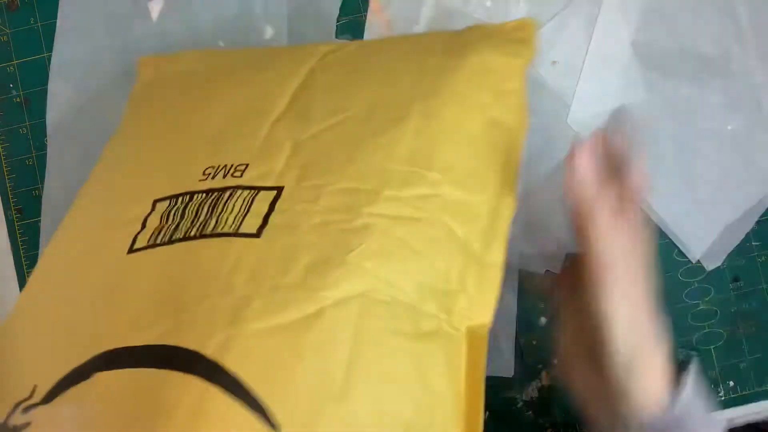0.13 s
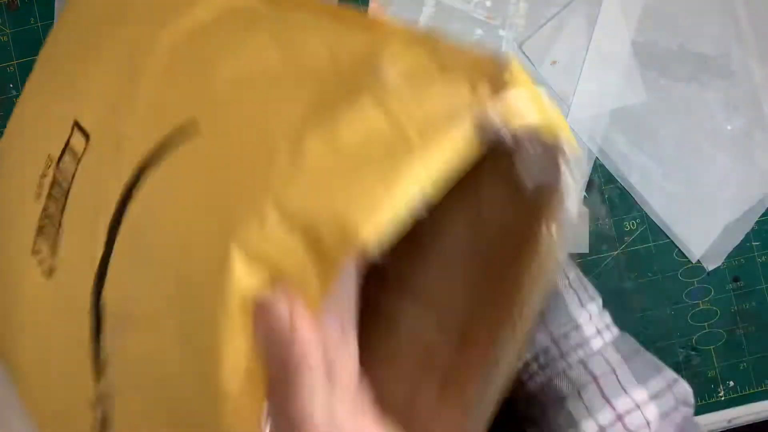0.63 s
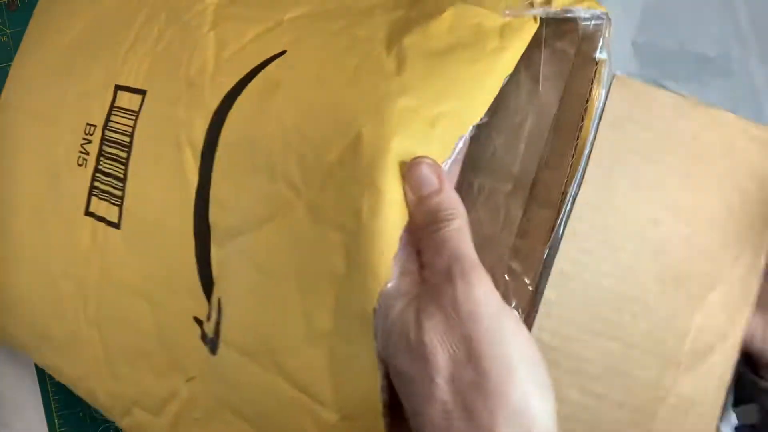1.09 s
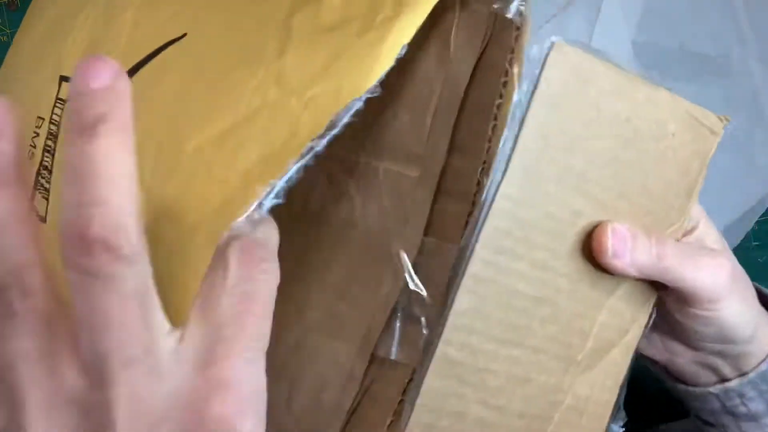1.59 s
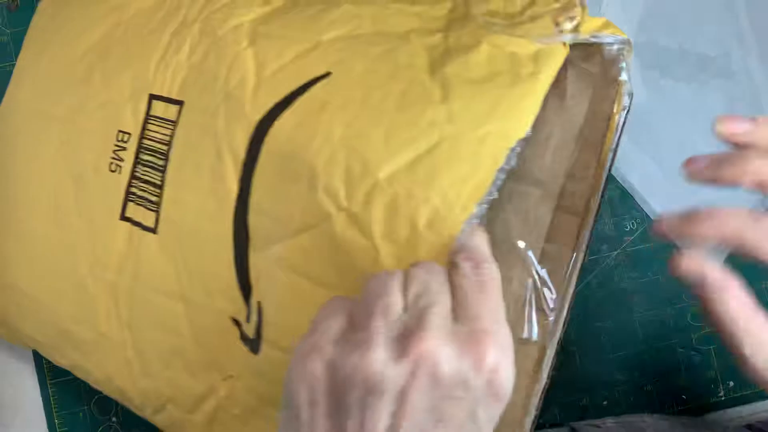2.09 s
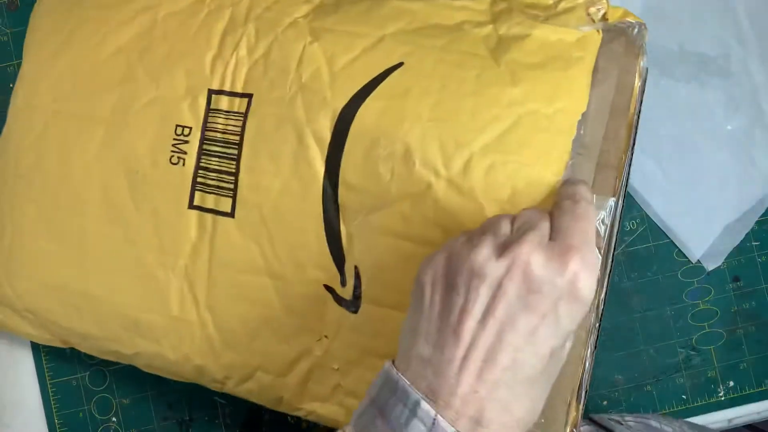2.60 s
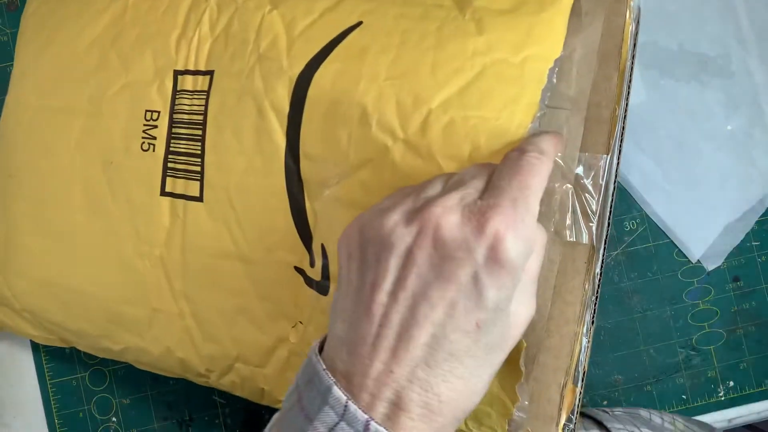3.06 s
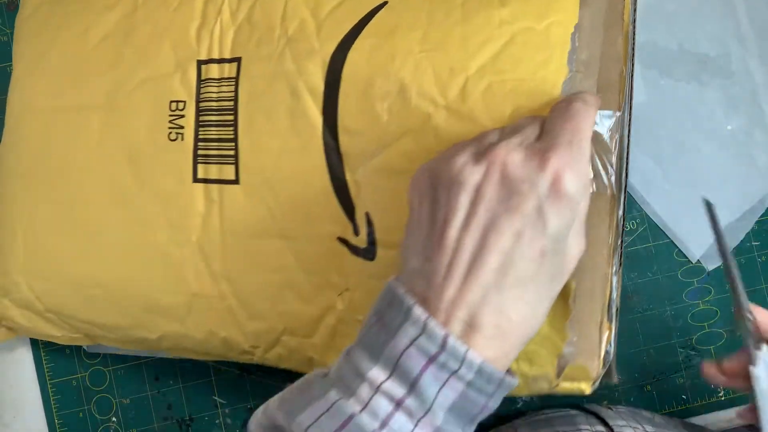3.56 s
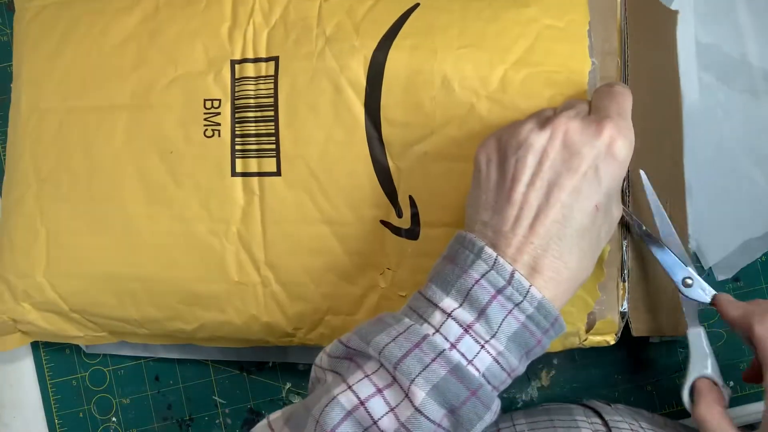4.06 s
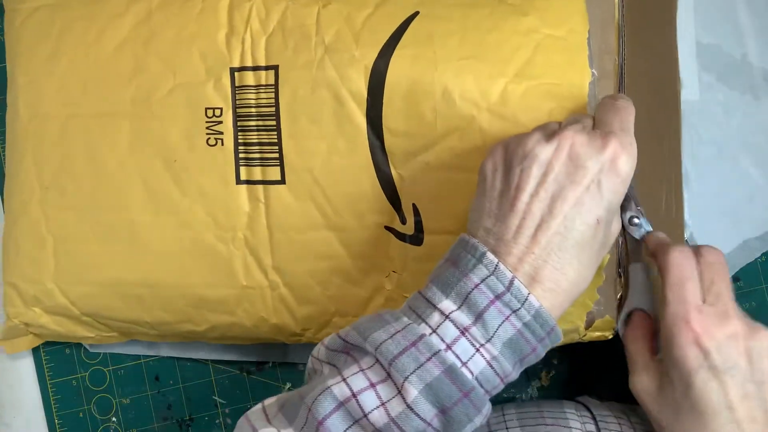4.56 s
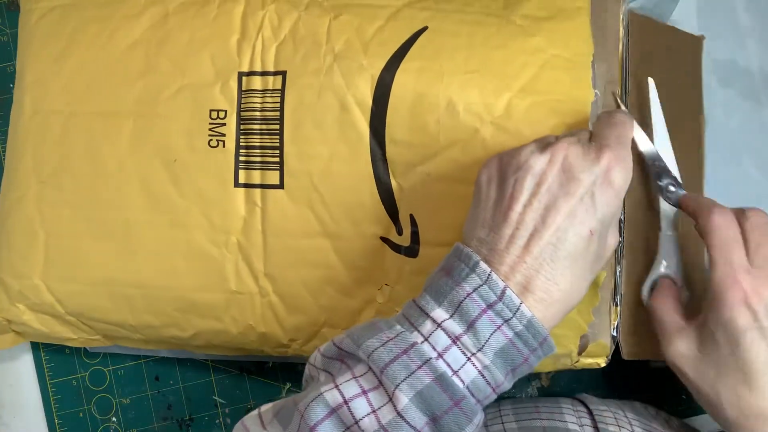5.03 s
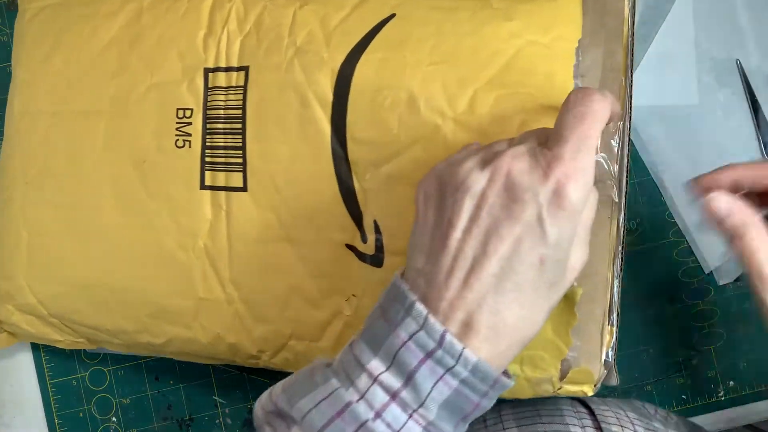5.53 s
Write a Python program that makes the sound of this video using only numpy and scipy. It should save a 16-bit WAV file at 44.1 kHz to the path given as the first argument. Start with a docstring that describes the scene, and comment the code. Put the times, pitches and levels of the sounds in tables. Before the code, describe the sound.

Very close in a small quiet room, a stiff padded mailer is turned and gripped, with loud snapping crinkles, hollow box knocks and low desk thuds. After two seconds it calms to faint finger rubbing and tiny metal ticks, then a soft slide. Lighter crackles and knocks return around four seconds, and scissors clack sharply on the mat near the end.

```python
"""A padded paper mailer with a cardboard box inside is turned and pressed close to two microphone ports.
Paper is shaped noise with snapping folds and ringing facets; the box knocks and hums through resonances;
desk and mat rumble as the weight lands. Later a taped edge hums under a finger, small tools jingle,
something smooth slides and scissors strike the mat, the steel being decaying modes. Quiet small room."""
import sys
import numpy as np
from scipy import signal
from scipy.fft import rfft, irfft
from scipy.io import wavfile
from scipy.ndimage import uniform_filter1d

SR = 44100
rng = np.random.default_rng(int(sys.argv[2]) if len(sys.argv) > 2 else 0)


def dump(signal):
    """Clip the signal to [-1, 1] and save it as 16-bit WAV at the path in sys.argv[1]."""
    limited = np.clip(np.atleast_2d(signal).T, -1, 1)
    pcm = np.round(limited * 32767).astype(np.int16)
    wavfile.write(sys.argv[1], SR, pcm)


def gain_from_db(level_db):
    """Convert decibel levels to linear amplitude factors (20 dB per decade)."""
    decades = np.asarray(level_db, float) / 20
    return 10 ** decades


N = 249606
TIME = np.arange(N) / SR
COARSE = np.arange(0, N / SR, .002)  # slower clock for gestures, s

# Edges between the dull, crisp and hissing parts of the paper. Three values: low, middle, high in Hz.
SPLIT_HZ = (644, 2910, 6250)


def over_hz(table, column):
    """One column of a frequency table on the transform's bins, interpolated over log frequency."""
    hz = np.maximum(np.arange(N // 2 + 1) * SR / N, 1)
    return np.interp(np.log(hz), np.log(np.array(table)[:, 0]), np.array(table)[:, column])


def noise():
    """Unrelated white noise for the two ports."""
    return rng.standard_normal((2, N))


def sides(pan_db):
    """Gains of left and right for a left-minus-right level."""
    return gain_from_db(np.array([pan_db, -pan_db]) / 2)


def unit(x):
    """Scale to rms 1."""
    return x / np.sqrt(np.mean(x ** 2))


def add(out, s, burst):
    """Mix a burst in from time s."""
    i = int(s * SR)
    out[..., i:i + burst.shape[-1]] += burst[..., :N - i]


def fade(t60_s, rise_s):
    """Quick rise, exponential fall."""
    t = np.arange(int(1.2 * t60_s * SR) + 64) / SR
    return (1 - np.exp(-t / rise_s)) * np.exp(-np.log(1000) * t / t60_s)


def swells(s, held_s, db, rise_db_s, fall_db_s):
    """Power of gestures that rise, hold and let go at steady rates in dB, one row each."""
    start, end = s[:, None], (s + held_s)[:, None]
    before_s = np.maximum(start - COARSE, 0)
    after_s = np.maximum(COARSE - end, 0)
    return gain_from_db(2 * (db[:, None] - rise_db_s * before_s - fall_db_s * after_s))


def crackle(per_s, spread_db, t60_s, share):
    """Envelope of many tiny buckles, a few much larger, over even rubbing; rms 1."""
    chance, size = rng.random((N, 2)).T
    buckles = (chance < per_s / SR) * gain_from_db(-2 * spread_db * np.log(1 - size * .99))
    power = signal.lfilter([1], [1, -np.exp(-2 * np.log(1000) / (t60_s * SR))], buckles)
    return np.sqrt(1 - share + share * power / power.mean())


def resonate(x, modes):
    """Sum of resonances, scaled so that white noise of rms 1 comes out near rms 1."""
    rung = sum(gain_from_db(db) * signal.lfilter(*signal.iirpeak(hz, hz / width_hz, fs=SR), x)
               for hz, width_hz, db in modes)
    return rung / np.sqrt(sum(gain_from_db(2 * db) * np.pi * width_hz / SR for hz, width_hz, db in modes))


def ring(x, hz, t60_s):
    """One mode: an impulse of 1 rings at amplitude 1 and dies in t60."""
    r, turn = np.exp(-np.log(1000) / (t60_s * SR)), 2 * np.pi * hz / SR
    return signal.lfilter([np.sin(turn)], [1, -2 * r * np.cos(turn), r * r], x)


def struck(blows, modes, contact_db, contact_s):
    """Each blow is a few milliseconds of rattling contact that rings the steel."""
    contact = np.zeros(N)
    for s, db in blows:
        add(contact, s, gain_from_db(db + contact_db) * fade(contact_s, rise_s=0.001))
    return sum(gain_from_db(db) * ring(contact * noise(), hz, t60_s) for hz, db, t60_s in modes)


def hands():
    """Grips over resting contact: crisp dB, dull and hiss dB over it, left minus right dB, box dB, resting dB."""
    # Hands resting and sliding on the parcel. Each row: time in seconds, paper level in dB,
    # brightness in dB, box over paper in dB, left minus right in dB.
    contact = [(0, -40, 0, -14, -8), (.6, -43, 2.5, -7.5, -6.5), (.87, -45.5, -2, 0, -5.5),
               (.98, -49.5, -4, -2.5, -7), (1.4, -38.5, 2.5, -22, -7.5), (1.63, -47, 1, -9, -5.5),
               (1.95, -46, -0.5, -13, -5), (2.1, -49.5, 4, -12, -6), (2.22, -59, 2, 0.5, -5),
               (2.45, -55, 2, -11, -8), (2.63, -65, -2, 8, -3.5), (2.77, -58, -5.5, 4.5, -5.5),
               (3.0, -63, -6, 0.5, -5.5), (3.1, -86, 7, 4, -7), (3.34, -68.5, 6, -11.5, -12.5),
               (3.4, -60, -3, 4, -7.5), (3.74, -62, -2, -1, -10), (3.9, -52, 4, -12.5, -3.5),
               (4.13, -53, -0.5, -7, 2.5), (4.3, -46.5, -1, 2.5, -6.5), (4.5, -51, 1.5, -2, -3.5),
               (4.9, -55.5, -4, -20, -9.5), (4.96, -60.5, 4.5, 2, -7.5), (5.169, -58.5, 6.5, -15, -6),
               (5.268, -74, 5, -8, -12), (5.3, -68, 12, 6, -15), (5.4, -53.5, 1.5, -6, -1.5),
               (5.49, -60, -2, -1, -2), (5.66, -56.5, -6, -6, -5.5)]
    # Fingers gripping, pressing and pulling. Each row: full grip at seconds, held seconds,
    # paper level in dB, brightness in dB, box over paper in dB.
    grips = [(0.0, 0.017, -30, -3.5, -5.5), (0.126, 0.025, -35.5, 0.5, -5), (.16, .012, -37.5, 7, -2),
             (.19, 0.072, -33.5, -2, -4.5), (0.289, 0.026, -32.5, 0.5, -11.5),
             (0.403, 0.019, -35, -1, -5.5), (.46, 0.06, -35, -2, -12), (0.523, 0.0081, -45, 1, 10),
             (0.632, 0.038, -30, -2.5, -4), (.69, 0.031, -32.5, -3, -10), (0.799, 0.032, -37.5, -1, -12),
             (1.006, 0.022, -40, 0.5, -20), (1.13, 0.026, -41, 0, -9), (1.17, 0.06, -35.5, -3.5, -1),
             (1.24, 0.04, -31, 1.5, 0), (1.35, 0.02, -39, -4, 3), (1.465, 0.0048, -35.5, 6, 1.5),
             (1.49, 0.046, -41.5, -4, 0.5), (1.55, 0.071, -47, 7, -2), (1.652, 0.0087, -31.5, 4, -30),
             (1.703, 0.028, -30.5, -0.5, -6.5), (1.828, 0.059, -41.5, 2.5, -9),
             (1.889, 0.01, -44, -12.5, 2), (2.038, 0.018, -36.5, -4.5, -13), (2.109, 0.0083, -46, -1, -14),
             (2.318, 0.071, -47.5, -3, -4), (2.37, 0.035, -44.5, 1, -8), (2.44, 0.017, -58.5, -2, 2),
             (2.708, 0.014, -59, -17.5, 9), (2.8, .015, -65, 7, -6), (2.88, 0.014, -56.5, 8, 6),
             (2.97, 0.014, -55.5, 4, -3), (3.8, 0.038, -53, 5.5, -0.5), (3.86, 0.039, -49, 6, -16),
             (4.18, 0.059, -58.5, -4, 8), (4.27, 0.0084, -45, -1, -12), (4.35, 0.038, -57, 0, 15.5),
             (4.385, 0.027, -61.5, 0, 16), (4.554, 0.038, -42.5, 1.5, 1.5), (4.616, 0.0084, -46, 2, 0.5),
             (4.665, 0.012, -41.5, -1, -5), (4.71, 0.044, -49, -1, 4), (4.75, 0.024, -52.5, 10, 16),
             (4.784, 0.0077, -49, 0, 21), (4.825, 0.019, -48.5, 10.5, 14.5), (5.133, 0.0062, -61, 3, -17),
             (5.281, .02, -45, 7, -28), (5.303, 0.0042, -31, -1, -9), (5.624, 0.0041, -43.5, -4, -3)]
    dull_offset_db, hiss_offset_db = -7.5, -10  # over the crisp part at brightness 0

    at, *columns = np.transpose(contact)
    rest_db, rest_bright, rest_box, pan_db = (np.interp(COARSE, at, c) for c in columns)
    s, held_s, db, bright, on_box = np.transpose(grips)
    # 596.5 dB/s for a 67 ms hold; shorter grips come on faster
    rise_db_s = 596.5 * (0.067 / np.clip(held_s, .005, .2))[:, None] ** 0.27
    grip_power = swells(s, held_s, db, rise_db_s, fall_db_s=305.5)

    def total_db(rest, grip):
        """Rest and grips added in power, each with its offset in dB."""
        return 10 * np.log10(gain_from_db(2 * (rest_db + rest)) + gain_from_db(2 * grip) @ grip_power)

    crisp_db = total_db(0, 0 * db)
    dull_db = total_db(-rest_bright, -bright) - crisp_db + dull_offset_db
    hiss_db = total_db(rest_bright, bright) - crisp_db + hiss_offset_db
    controls = (crisp_db, dull_db, hiss_db, pan_db, total_db(rest_box, on_box), rest_db)
    return [np.interp(TIME, COARSE, c) for c in controls]


def paper(touch):
    """Rustle and snapping folds shake the same sheet: three spectral parts, each with its own strength."""
    # Folds snapping. Each row: start in seconds, level in dB, dull part and hissing part over it in dB,
    # panel pitch in Hz.
    cracks = [(.005, -20.5, 4.5, -4, 3620), (0.0406, -21.5, -1, -5.5, 2620), (.1214, -29, 6.5, -5, 3380),
              (.194, -22.5, 1, -17, 3820), (0.2157, -19, -11, -9, 3140), (0.2887, -13.5, -9.5, -5, 4110),
              (0.3384, -26, 7, -20, 1580), (0.399, -11.5, -24, -2, 4840), (0.5214, -15, 0, -2.5, 6300),
              (0.5241, -19.5, 3, -13.5, 1050), (0.5541, -24.5, -20, -1, 6840), (.63, -22, -1, -13, 3530),
              (.7144, -45, -9, 11, 1180), (.7716, -26, -23, -18, 6200), (0.781, -24.5, -19, -10, 5760),
              (0.8151, -22.5, -1.5, -22, 1410), (0.887, -38, -14, 0, 980), (0.9371, -34, -17, .5, 6400),
              (.972, -40, 0, -3, 2020), (0.987, -32, -21, -7, 6750), (1.004, -22, -6, -4, 5100),
              (1.122, -46.5, -5, 9, 2940), (1.14, -29, 0, -1, 4800), (1.1636, -34, 7.5, 4, 1650),
              (1.234, -23, -16.5, -1, 3300), (1.2435, -23, -2, -10, 1380), (1.268, -17, -1.5, 0.5, 6060),
              (1.3379, -37, -4, -15, 4200), (1.3735, -25, -2.5, -13, 1750), (1.465, -21, -0.5, -2.5, 4880),
              (1.487, -27, 1, -12, 1520), (1.6521, -22, -0.5, -3, 1580), (1.6636, -14.5, -5, -8, 4450),
              (1.711, -23, 2.5, -17, 5160), (1.8388, -35, 4, 1, 2100), (1.8819, -32, -8, -9, 1200),
              (1.9216, -27.5, -10, -9, 6030), (2.021, -36, 5, 5, 4060), (2.0442, -27, -20, -8, 1274),
              (2.1123, -32, -13, -14, 5940), (2.135, -34, -12, -2.5, 5900), (2.185, -46.5, -4, -17, 2100),
              (2.2777, -40, -9, -5, 4500), (2.365, -36.5, 4, -6, 1860), (2.4608, -33, -25, -17, 5700),
              (2.577, -40.5, -9, -14, 5440), (2.643, -33.5, -26, -14.5, 3700),
              (2.7066, -34.5, -7, -19, 1160), (2.7217, -34, -17, -8, 1600), (2.8004, -47, -7, 1, 1000),
              (2.859, -42.5, -3, -8, 1830), (2.895, -38.5, -0.5, -1, 1820), (2.9254, -47, -17, 3, 2620),
              (2.969, -46, 7.5, -15, 2740), (2.979, -37.5, -1.5, -10, 6250), (3.0475, -56.5, -21, -1, 4440),
              (3.1626, -50.5, -4, -11.5, 4350), (3.2144, -57.5, -13.5, -15.5, 2490),
              (3.271, -49, -24, -17, 5930), (3.3116, -49.5, -13, -15, 6660), (3.3666, -34, 1.5, -3.5, 1850),
              (3.7827, -36.5, -2, -5.5, 3670), (3.8016, -44, -2, -14, 1320), (4.3112, -37, -21, 7, 7100),
              (4.3546, -27.5, 0, -7, 3470), (4.5395, -26.5, -10, -19, 6900), (4.555, -35, 3.5, -2, 3280),
              (4.577, -28.5, -2, -3.5, 3220), (4.6126, -28.5, -21, -5, 3200), (4.6462, -45, 12, 12.5, 1220),
              (4.6636, -24.5, 1, -0.5, 4700), (4.705, -26, 2.5, -2.5, 1560),
              (4.7658, -39.5, 7.5, -10, 1280), (4.782, -27, -6, -3, 1510), (4.8835, -40.5, 8.5, -8, 2540),
              (5.13, -36, -11, 3.5, 2480), (5.2761, -13.5, -18, -10, 4100), (5.3037, -12, -5, 4, 4430),
              (5.3745, -37, -21, -17, 4520), (5.4191, -39, -19, -13, 5300), (5.5564, -39, 3.5, -25, 3370),
              (5.5895, -45.5, 4, -34, 2120), (5.6252, -21, -8.5, -23, 5000),
              (5.6314, -21.5, -18, -16, 3230)]
    # Tone shaping of the paper noise. Each row: frequency in Hz, gain in dB.
    tone_shaping = [(700, -12), (1500, -2.5), (3000, -4), (5000, -4.5), (7000, 1), (9000, 10.5), (11000, 2),
                    (13000, 2.5), (15500, -3.5)]

    crisp_db, dull_db, hiss_db, pan_db, *_ = touch
    shared = sides(pan_db) * crackle(per_s=260, spread_db=3.5, t60_s=0.057, share=0.5)
    parts_db = (crisp_db + dull_db, crisp_db, crisp_db + hiss_db)
    rustle = [gain_from_db(db) * shared * crackle(per_s=660, spread_db=3.5, t60_s=0.029, share=0.14) for db in parts_db]
    power = np.array(rustle) ** 2
    panels = np.zeros((2, N))
    for (s, db, dull, hiss, hz), turn in zip(cracks, rng.random((len(cracks), 2, 1))):
        place = sides(pan_db[int(s * SR)])[:, None]
        # larger, lower panels settle longer
        shape = fade(0.033 * (4600 / hz) ** 0.9, rise_s=.0002)
        # the fold gives way at once, then settles
        shape = shape * (0.5 + 1.35 * np.exp(-np.arange(len(shape)) / (0.00057 * SR)))
        levels = gain_from_db(db - 2.0 + np.array([dull, 0, hiss]))[:, None, None]
        add(power, s, (levels * place * shape) ** 2)
        # the flat panel beside the fold rings for a few cycles
        facet = fade(min(40 / hz, .03), rise_s=0.00014)
        tone = np.sin(2 * np.pi * (hz * np.arange(len(facet)) / SR + turn))
        add(panels, s, gain_from_db(db) * place * facet * tone)

    low, middle, high = SPLIT_HZ
    bands = (signal.butter(2, [low, middle], "band", fs=SR, output="sos"),
             signal.butter(2, [middle, high], "band", fs=SR, output="sos"),
             signal.butter(2, high, "high", fs=SR, output="sos"))
    power[0] = np.roll(power[0], int(0.0026 * SR), axis=1)  # slow bending waves: the dull part arrives late
    gains = gain_from_db([12, 8, 8])
    sheet = sum(g * signal.sosfilt(b, np.sqrt(p) * noise()) for g, b, p in zip(gains, bands, power))
    return irfft(rfft(sheet) * gain_from_db(over_hz(tone_shaping, 1)), N) + panels


def crinkles(touch, per_s, spread_db, cycles):
    """Small flat facets between creases pop at random; each size of facet rings at its own pitch."""
    crisp_db, dull_db, hiss_db, pan_db, *_ = touch
    out = np.zeros((2, N))
    for hz in np.geomspace(900, 14000, num=22):
        when, size = rng.random((N, 2)).T
        pops = (when < per_s / SR) * gain_from_db(-spread_db * np.log(1 - .98 * size))
        tilt_db = dull_db if hz < SPLIT_HZ[1] else hiss_db if hz > SPLIT_HZ[2] else 0
        pops = pops * gain_from_db(crisp_db + tilt_db) * sides(pan_db) * np.sign(noise())
        out += ring(pops, hz, cycles / hz)
    return out


def box(touch):
    """Rubbing and knocks shake the hollow box's resonances; a knock also rings briefly at its own pitch."""
    # Resonances of the box. Each row: frequency in Hz, width in Hz, level in dB.
    box_modes = [(259, 100, 2.5), (370.8, 25, 6), (453, 56, 3), (560, 100, 6.5), (724, 23, 2),
                 (845, 38, -1.5)]
    # Box and mat knocked. Each row: start in seconds, level in dB, nominal pitch in Hz,
    # t60 in seconds before limiting, left minus right in dB.
    knocks = [(0.048, -29.5, 232, 0.079, -0.5), (0.129, -39, 458, 0.055, 3), (0.152, -30.5, 382, 0.043, 3),
              (0.192, -27.5, 425, 0.081, -14), (0.246, -29, 737, 0.064, -6), (0.292, -35, 422, 0.074, -1),
              (0.338, -34, 557, 0.14, -11), (0.524, -20.5, 563, 0.06, -13), (0.54, -31.5, 240, 0.06, -1),
              (0.629, -32.5, 226, 0.16, -11.5), (0.781, -36.5, 228, 0.16, -1),
              (0.813, -22, 790, 0.018, -14), (1.004, -32, 358, 0.089, 9), (1.166, -24.5, 383, 0.057, 7.5),
              (1.239, -23.5, 883, 0.056, 2), (1.291, -34.5, 383, 0.11, -7), (1.363, -27, 640, 0.05, -8),
              (1.469, -29.5, 205, 0.029, -18), (1.492, -27.5, 418, 0.021, 12),
              (1.652, -24, 538, 0.042, 1.5), (1.704, -33, 314, 0.044, 2), (1.716, -36, 348, 0.064, 9),
              (1.74, -26, 560, 0.045, 2), (1.796, -40, 705, 0.047, -7), (1.89, -39, 475, 0.16, 0),
              (2.041, -39.5, 726, 0.14, -10), (2.31, -42.5, 359, 0.12, -4), (2.706, -34.5, 823, 0.028, -7),
              (2.883, -44.5, 378, 0.15, 2.5), (3.367, -40, 617, 0.046, 5), (3.775, -46, 596, 0.033, -2),
              (3.802, -29, 557, 0.03, 4), (3.81, -36, 230, 0.056, -4), (3.975, -50.5, 322, 0.05, -8),
              (4.156, -29.5, 423, 0.028, -4), (4.266, -41.5, 427, 0.073, 4), (4.35, -32.5, 541, 0.083, -2),
              (4.551, -45, 534, 0.066, 7), (4.577, -26.5, 490, 0.03, 3), (4.614, -27, 404, 0.017, 16),
              (4.646, -29.5, 612, 0.039, 2), (4.705, -26, 610, 0.048, 4), (4.743, -29.5, 415, 0.033, 13),
              (5.007, -41.5, 456, 0.05, -5.5), (5.28, -32, 332, 0.03, 6), (5.311, -23, 386.5, 0.08, 3),
              (5.332, -33.5, 351.5, 0.11, 4), (5.629, -36, 380, 0.072, 3)]
    sag = .35  # share of its pitch by which a knock sinks as the board springs back

    rubbing = gain_from_db(touch[-2] - 5.0) * crackle(per_s=130, spread_db=6.0, t60_s=0.02, share=0.3)
    power = rubbing ** 2 * np.ones((2, 1))
    rings = np.zeros((2, N))
    for (s, db, hz, t60_s, pan_db), turn in zip(knocks, rng.random((len(knocks), 2, 1))):
        shape = sides(pan_db)[:, None] * fade(np.clip(t60_s, .015, .12), rise_s=0.0014)
        add(power, s, (gain_from_db(db - 6) * shape) ** 2)
        pitch_hz = hz * (1 + sag * (np.exp(-np.arange(shape.shape[1]) / (0.0055 * SR)) - .3))
        tone = np.sin(2 * np.pi * (np.cumsum(pitch_hz) / SR + 0.41 * turn))
        add(rings, s, gain_from_db(db) * shape * tone)
    return resonate(np.sqrt(power) * noise(), box_modes) + rings


def desk(touch):
    """The desk top and the mat on it shake at a few low resonances; each landing starts with one push."""
    # The parcel's weight landing. Each row: time in seconds, desk top level in dB, mat level in dB.
    thumps = [(0.026, -54, -57), (.05, -56, -49), (0.188, -40.5, -39.5), (0.346, -67, -49),
              (.538, -50, -39), (0.643, -58, -43), (.692, -41.5, -46), (0.778, -45, -58),
              (1.003, -48, -40.5), (1.128, -37, -51), (1.163, -48, -38.5), (1.272, -48, -62),
              (1.324, -41, -56), (1.374, -52, -42.5), (1.468, -52, -40), (1.49, -43, -44),
              (1.656, -62, -47), (1.69, -47.5, -61), (1.877, -52, -58), (2.043, -65, -56),
              (2.218, -73, -82), (2.318, -75, -50), (2.362, -60, -50.5), (2.666, -53, -74),
              (2.792, -75, -69), (2.89, -76, -60), (2.936, -69, -63), (3.371, -73, -67),
              (3.802, -76, -51.5), (4.025, -64, -65), (4.16, -69, -54), (4.262, -80, -68),
              (4.348, -92, -66), (4.422, -62, -51), (4.579, -55, -62), (4.707, -70, -44.5),
              (4.763, -69, -50), (4.799, -53, -44.5), (5.039, -73, -76), (5.28, -56, -43),
              (5.312, -53, -37), (5.591, -54, -53), (5.632, -63, -50)]
    # Resonances of the desk top. Each row: frequency in Hz, width in Hz, level in dB.
    desk_modes = [(54, 12, -1.5), (72.6, 6.4, -14.5)]
    # Resonances of the mat. Each row: frequency in Hz, width in Hz, level in dB.
    mat_modes = [(122, 88, 1), (171, 20, -2.5)]
    follows_db = -25  # steady shaking passed on by the resting hands, over their paper level
    landing_db, landing_s = -4.5, 0.003  # the push over the shaking; its length

    s, desk_db, mat_db = np.transpose(thumps)
    push = np.hanning(int(landing_s * SR))
    push = push / push.sum() * np.sqrt(.03 * SR)

    def shake(db, fall_db_s):
        """Force on one body."""
        landings = swells(s, 0.012, db, rise_db_s=1999.5, fall_db_s=fall_db_s).sum(axis=0)
        power = np.interp(TIME, COARSE, landings)
        force = np.sqrt(power + gain_from_db(2 * (touch[-1] + follows_db))) * noise()
        scatter = 1 + 0.73 * rng.standard_normal((len(s), 2, 1))
        for at, size in zip(s, gain_from_db(db + landing_db)[:, None, None] * scatter):
            add(force, at, size * push)
        return force

    return resonate(shake(desk_db, 259), desk_modes) + resonate(shake(mat_db, 361), mat_modes)


def air():
    """The quiet room and the microphones' own hiss: steady shaped noise."""
    # Spectrum of the background. Each row: frequency in Hz, relative density in dB per Hz.
    spectrum = [(24, -25), (40, -0.5), (75, 1), (1050, -41.5), (1830, -19.5), (3740, -25), (4260, -20.5),
                (7000, -26), (9100, -51.5), (15400, -120)]
    return gain_from_db(-73.5) * unit(irfft(rfft(noise()) * gain_from_db(over_hz(spectrum, 1)), N))


def drag(touch):
    """A finger drags along the box's taped edge: friction noise follows the hand and hums faintly in resonances."""
    # Resonances of the taped edge. Each row: frequency in Hz, width in Hz, level in dB.
    edge_modes = [(995, 37, 1), (1200, 60, -5), (1930, 70, -5.5)]
    from_s, to_s, over_paper_db = 2.15, 3.02, -6
    moving = uniform_filter1d(1. * (TIME > from_s) * (TIME < to_s), size=2000)
    return resonate(moving * gain_from_db(touch[0] + over_paper_db) * noise(), edge_modes)


def tools():
    """Small steel tools, nudged while reaching for the scissors, ring as decaying modes."""
    # Nudges. Each row: start in seconds, level in dB before the contact gain.
    jingles = [(2.707, -29), (2.721, -25), (2.8, -37), (2.895, -37), (2.978, -39)]
    # Modes of the tools. Each row: frequency in Hz, level in dB, t60 in seconds.
    tool_modes = [(993, -3, .11), (1290, -8, .054), (1643, -1, .13), (3750, -10, .06), (6250, -11, .05),
                  (9900, -9, .05), (12300, -15, .06)]
    return struck(jingles, tool_modes, contact_db=-20.0, contact_s=0.0085)


def slide():
    """Something smooth slides over the mat: even friction noise through the slider's hollow."""
    # Strength of the friction. Each row: time in seconds, level in dB.
    friction = [(3.32, -72), (3.368, -56), (3.38, -65), (3.39, -62.5), (3.63, -56), (3.658, -62),
                (3.682, -58.5), (3.754, -74), (3.78, -68)]
    # Resonances of the hollow. Each row: frequency in Hz, width in Hz, level in dB.
    hollow_modes = [(583, 110, 10), (1000, 440, -8)]
    s, db = np.transpose(friction)
    moving = (TIME > s[0]) & (TIME < s[-1])
    return resonate(moving * gain_from_db(np.interp(TIME, s, db)) * noise(), hollow_modes)


def scissors():
    """Scissors meet the mat: brief contacts ring the blades' modes."""
    # Contacts. Each row: start in seconds, level in dB before the contact gain.
    clanks = [(3.3672, -40), (5.266, -43), (5.2759, -28), (5.298, -29), (5.3045, -8.5), (5.306, -19),
              (5.3134, -14.5), (5.3225, -40), (5.6251, -30)]
    # Modes of the blades. Each row: frequency in Hz, level in dB, t60 in seconds.
    blade_modes = [(1000, -10, .035), (1330, -10, .035), (2420, -9, .035), (3680, -14, .06),
                   (4030, -12, .04), (4300, -12, .04), (6400, -11, .03), (9700, -6, .025), (10000, -9, .04),
                   (12100, -9, .03), (12670, -6, .04), (12825, -2, .045), (12930, -7, .04),
                   (14400, -13, .03)]
    return struck(clanks, blade_modes, contact_db=-11.0, contact_s=0.0098)


def room(near):
    """Short dull room tail: low-passed decaying noise, convolved with the near sound."""
    shape = fade(0.2, rise_s=0.0014)
    tail = signal.lfilter([1], [1, -.6], rng.standard_normal((2, len(shape))) * shape)
    tail = tail * gain_from_db(-18.5) / np.sqrt(np.sum(tail[0] ** 2))
    return signal.fftconvolve(near, tail, axes=1)[:, :N]


def scene():
    """All sources at the desk; the thin steel barely wakes the room, so it gets no tail."""
    touch = hands()
    near = paper(touch) + crinkles(touch, per_s=25, spread_db=2.0, cycles=32.0)
    near = near + box(touch) + desk(touch) + drag(touch) + slide()
    return near + room(near) + air() + tools() + scissors()


def borrow(left, right, like, lead_rad):
    """Replace part of the right spectrum by the left one turned in phase; like is the share, 0-1."""
    return like * left * np.exp(-1j * lead_rad) + np.sqrt(1 - like ** 2) * right


def band_limit(x):
    """A steep low-pass at the top of the band."""
    return signal.sosfilt(signal.butter(12, 16970, fs=SR, output="sos"), x)


def record(dry):
    """Peaks are rounded; the right port borrows from the left by a share that changes with frequency,
    high in the deepest bass and much of the treble; top and bottom are cut."""
    # The two ports over the whole range. Each row: frequency in Hz, likeness 0-1, left leads in rad,
    # left minus right in dB.
    ports = [(50, 0.99, 0, -4.5), (212, 0.46, 2.27, -4.5), (380, 0.86, 0, 2), (830, 0.14, 2.5, -2),
             (5000, 0.18, 1.13, 2.5), (6200, 1, 1.65, 7), (16700, 0.2, 0.23, 1.5)]
    # The treble both ports share. Each row: frequency in Hz, likeness 0-1, left leads in rad.
    shared_treble = [(6000, 0, 1.5), (7000, .5, 2.3), (7500, .93, 2.95), (7950, .997, 3.14),
                     (9800, .997, 3.14), (10400, .86, 3.6), (11400, .62, 4.5), (12100, .75, 5.3),
                     (12800, .96, 6.1), (13300, .98, 6.28), (16000, .96, 6.28)]

    dry = .8 * np.tanh(dry / .8)
    left, right = rfft(dry) * sides(over_hz(ports, 3))
    right = borrow(left, right, np.clip(over_hz(ports, 1), 0, 1), over_hz(ports, 2))
    right = borrow(left, right, over_hz(shared_treble, 1), over_hz(shared_treble, 2))
    pair = irfft(np.array([left, right]), N)
    pair = signal.sosfilt(signal.ellip(8, .2, 60, 15900, fs=SR, output="sos"), pair)
    pair = signal.sosfilt(signal.butter(3, 38, "high", fs=SR, output="sos"), pair)
    return band_limit(pair)


dry = scene()
out = record(dry)
dump(out)
```